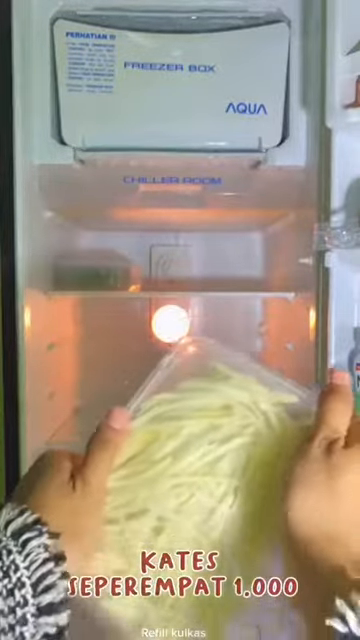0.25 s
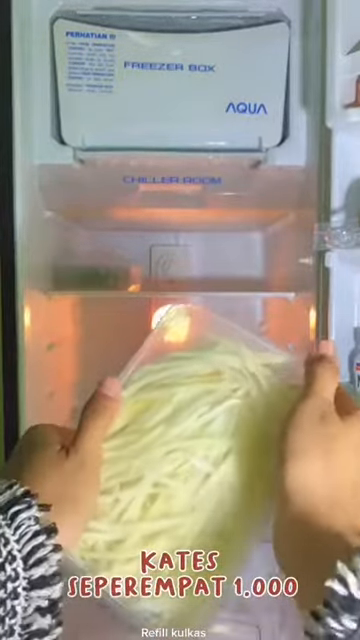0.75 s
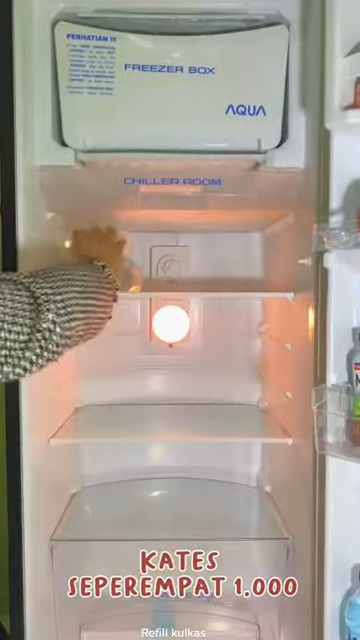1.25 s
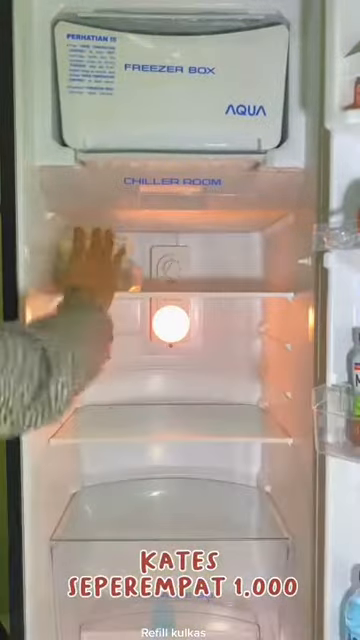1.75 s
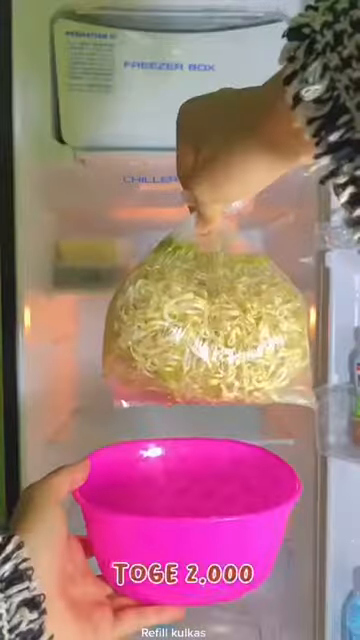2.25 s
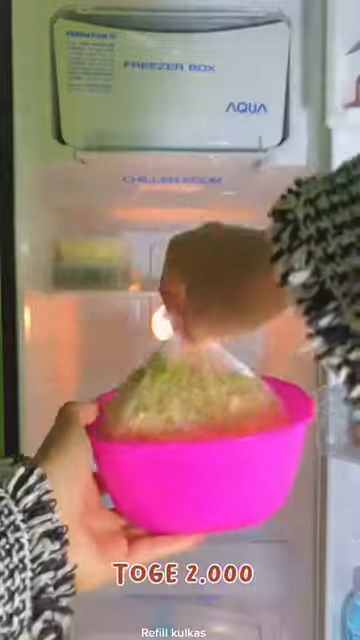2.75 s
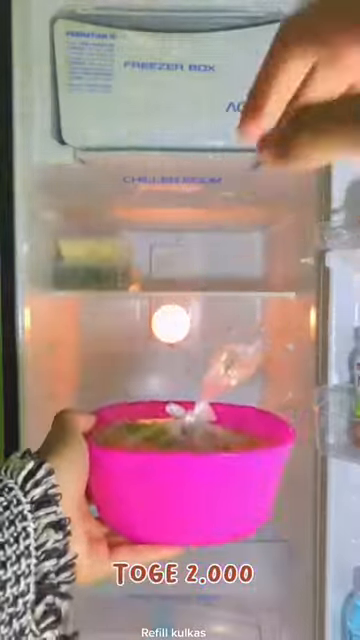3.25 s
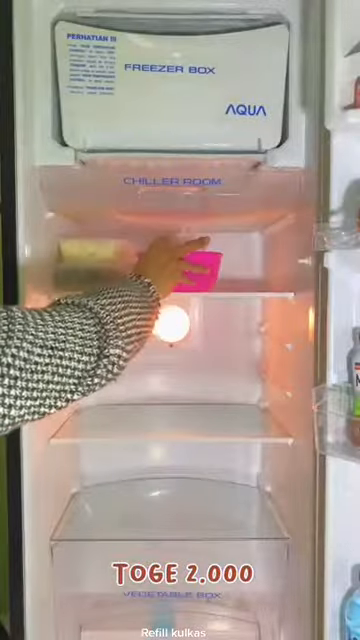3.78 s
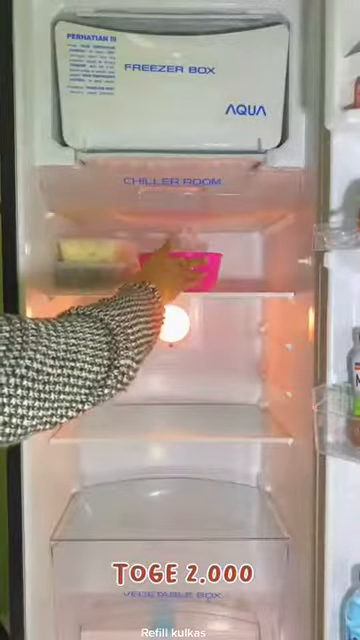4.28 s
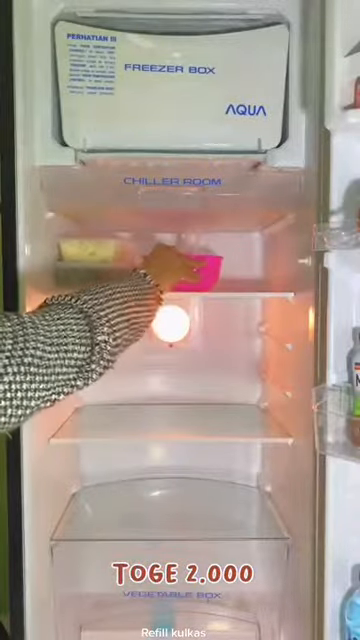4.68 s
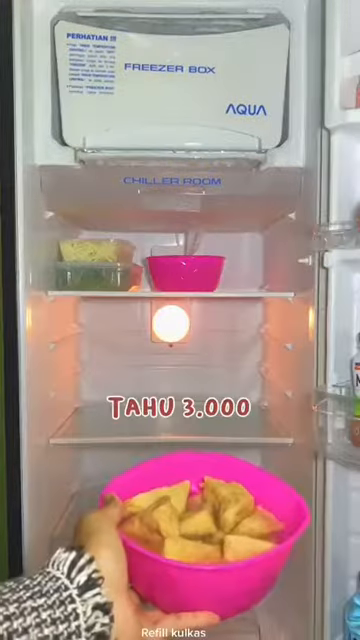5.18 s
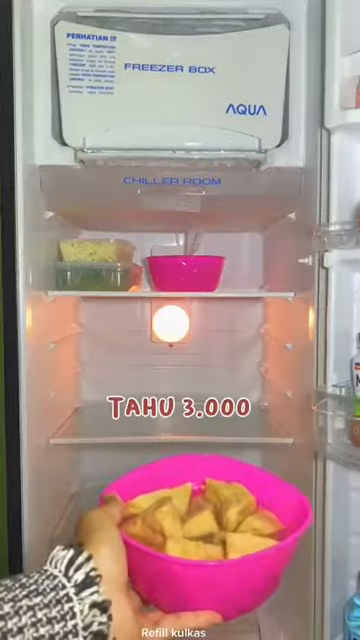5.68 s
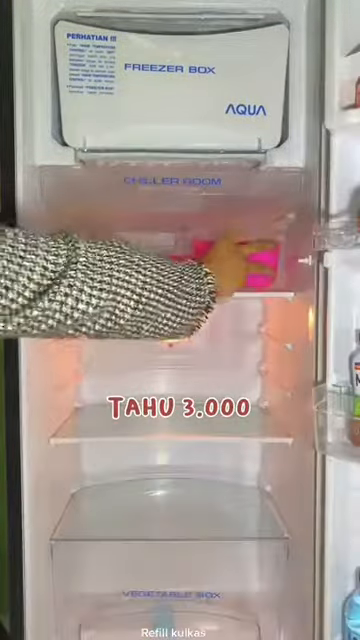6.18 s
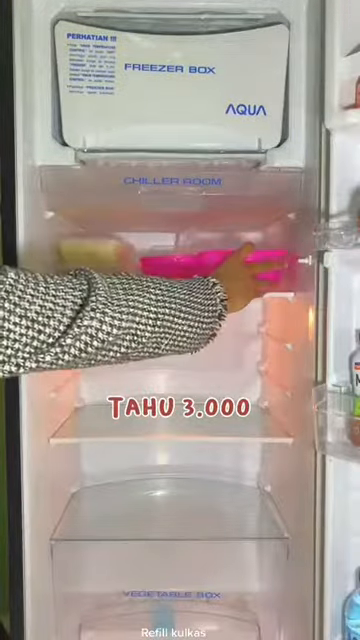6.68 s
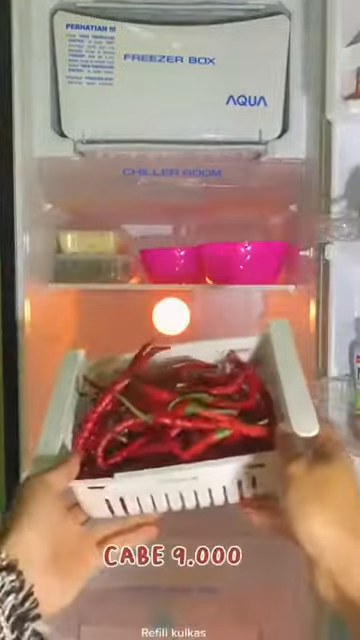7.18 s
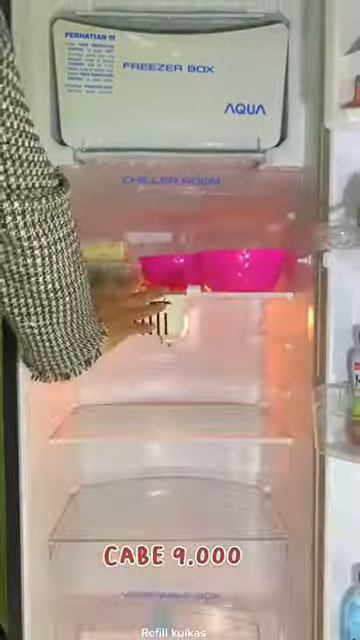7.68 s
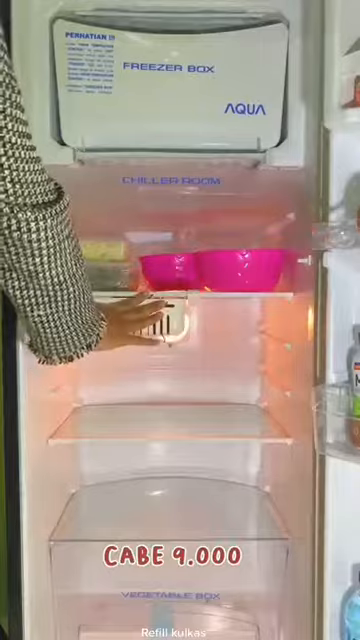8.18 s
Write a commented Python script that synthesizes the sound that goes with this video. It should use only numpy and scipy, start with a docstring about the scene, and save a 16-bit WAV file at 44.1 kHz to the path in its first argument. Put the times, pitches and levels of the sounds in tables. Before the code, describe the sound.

A low, muffled drone of traffic and engines runs throughout, heard from a hard-walled kitchen with a short echo. At first a plastic bag is patted, with quick pops and crinkles, loudest from 0.6 to 0.8 seconds. Around 1.1 seconds plastic knocks and scrapes on a glass fridge shelf, followed by a deep engine hum and a faint wavering tone. A bag crackles and pops from 2.4 to 2.8 seconds. A plastic bowl clacks down at 3.5 seconds, slides softly, and knocks again with a sharp click at 4.7. After a quieter stretch, another bowl lands at 6.1 seconds, with scrapes, rustles and lighter bumps. A plastic tray rattles sharply near 6.9 seconds, then scrapes and knocks onto the shelf from 7.6 to 7.9. Everything is close to the phone microphone, and each brief moment stops abruptly before the next.

```python
"""Pops, crinkles, knocks and scrapes sound over a low drone of traffic and engines beyond the walls.
Bags and plastic bowls are patted, slid and set down on the glass shelves of an open fridge in a
hard-walled kitchen. Air trapped in the bags pops, their creases snap, and the bowls ring and shake the
shelves. Eight moments follow one another; each stops short and the next fades in.
A phone close to the door hears it all and clips the hardest knocks."""
import sys
import numpy as np
from scipy import signal
from scipy.fft import rfft, irfft
from scipy.io import wavfile
from scipy.ndimage import uniform_filter1d, map_coordinates

SR = 44100
rng = np.random.default_rng(int(sys.argv[2]) if len(sys.argv) > 2 else 0)


def int16_out(signal):
    """Quantize to a 16-bit WAV file."""
    q = np.round(np.clip(np.atleast_2d(signal).T, -1, 1) * 32767)
    wavfile.write(sys.argv[1], SR, q.astype(np.int16))


N = 372204

# where one moment stops and the next begins (time [s])
CUTS = [0.953, 1.984, 3.204, 4.779, 5.641, 6.837, 7.585]
# each moment's background (boom centre [Hz], boom half width [Hz], murmur [dB], cloth and film hiss [dB])
BACKGROUNDS = [(58.7, 14.7, -36, -57), (61.5, 12, -35.5, -53), (65, 17, -41.5, -58), (69.8, 18, -37, -49.5),
               (54, 13.3, -40, -59), (52.4, 9, -39.5, -48), (61, 16.4, -41, -57.5),
               (60.5, 14.4, -42, -60.5)]
# the notes, or modes, at which each thing rings (pitch [Hz], level [dB], time to fade by 60 dB [s])
CABINET_MODES = [(117.6, -9, 0.75), (145, -4, 0.16), (166.6, -10, 0.031)]
SHELF_MODES = [(234, -3, 0.17), (281, -6.5, 0.13), (300, -1, 0.13), (337.2, -6.5, 0.19), (378, -2.5, 0.18),
               (400, -5, 0.14), (440, -4.5, 0.1), (479.4, -3, 0.078), (571.4, -8.5, 0.3), (676, -20, 0.079),
               (784, -8, 0.031), (838, -10, 0.16)]
BOWL_MODES = [(867, 9, .03), (980, 8.5, 0.027), (1235, 12.5, .02), (1450, 7, 0.016), (1567, 8.5, 0.029),
              (1840, 7, .016), (2080, 7.5, .02), (2553, 3.5, .018), (3000, 0, .014), (3696, 2.5, 0.017),
              (4070, 2.5, .016)]
MODE_COUNT = len(CABINET_MODES + SHELF_MODES + BOWL_MODES)


def gain(db):
    """Turns decibels into a number to multiply by."""
    return np.exp(np.asarray(db) * (np.log(10) / 20))


def unit_rms(x):
    """Scales a sound to an average strength (rms) of 1."""
    return x / np.sqrt(np.mean(x ** 2))


def unit_peak(x):
    """Scales a sound so that its biggest swing is 1."""
    return x / np.max(np.abs(x))


def band(x, low_hz, high_hz):
    """Keeps mostly what lies between two frequencies, by filtering twice."""
    high_hz = min(high_hz, .45 * SR)
    centre_hz = np.sqrt(low_hz * high_hz)
    b, a = signal.iirpeak(centre_hz, centre_hz / (high_hz - low_hz), SR)
    return signal.lfilter(b, a, signal.lfilter(b, a, x))


def wander(per_s):
    """Glides to a new random value per_s times a second; rms 1."""
    step = int(SR / per_s)
    return unit_rms(uniform_filter1d(np.repeat(rng.standard_normal(N // step + 1), step), step)[:N])


def crackle(per_s, spread_db):
    """Random clicks of very unequal size; rms 1."""
    out, count = np.zeros(N), int(per_s * N / SR)
    sizes = rng.standard_normal(count) * gain(spread_db * rng.exponential(size=count))
    out[rng.integers(N, size=count)] = sizes
    return unit_rms(out)


def hump(t, swell_ms):
    """Swells to 1, then dies away."""
    age = t * 1000 / max(swell_ms, .3)
    return age * np.exp(1 - age)


def moment_index():
    """Tells which moment is playing at each sample."""
    return np.searchsorted(CUTS, np.arange(N) / SR)


def add(out, start_s, x):
    """Mixes x into out, stopping where its moment ends."""
    first = int(start_s * SR)
    end = min([int(cut * SR) for cut in CUTS if cut > start_s] + [N, first + len(x)])
    out[first:end] += x[:end - first]


def gesture(start_s, rise_s, hold_s, fall_db_per_s):
    """The loudness of one movement: it swells to 1, holds, then fades."""
    out, t = np.zeros(N), np.arange(SR) / SR
    swell = np.minimum(t / rise_s, 1) ** 0.88
    add(out, start_s, swell * gain(-fall_db_per_s * np.maximum(t - rise_s - hold_s, 0)))
    return out


def tone(times, hz, db, harmonics=((1, 0),), waver=0):
    """A note that follows pitch and level curves; waver makes both unsteady."""
    out, t = np.zeros(N), np.arange(times[0], times[-1], 1 / SR)
    bend, flutter = (waver * wander(per_s=14.4)[:len(t)] for _ in range(2))
    phase = 2 * np.pi * np.cumsum(np.interp(t, times, hz) * (1 + 0.0061 * bend)) / SR
    wave = sum(gain(harmonic_db) * np.sin(k * phase + k * k) for k, harmonic_db in harmonics)
    fade = np.minimum(np.minimum(t - times[0], times[-1] - t) / 0.02, 1)
    add(out, times[0], np.sqrt(2) * wave * gain(np.interp(t, times, db) + 4.5 * flutter) * fade)
    return out


def ring(modes, blow, chance, spread_db):
    """A blow sets the modes ringing; chance nudges the level and pitch of each. Peak 1."""
    out = 0
    for (hz, db, fade_s), (louder, sharper) in zip(modes, chance):
        decay = np.exp(-np.log(1000) / (fade_s * SR))
        angle = 2 * np.pi * hz * (1 + 0.0274 * sharper) / SR
        note = np.sin(angle) * signal.lfilter([1], [1, -2 * decay * np.cos(angle), decay ** 2], blow)
        out = out + gain(db + spread_db * louder) * note
    return unit_peak(out)


def favour(modes, best_hz, db_per_octave):
    """Where a thing is struck decides its loudest modes: those far from best_hz are turned down."""
    return [(hz, db - db_per_octave * abs(np.log2(hz / best_hz)), fade_s) for hz, db, fade_s in modes]


def traffic():
    """Traffic through the walls: a deep boom, pitched anew each moment, over a murmur and faint hiss."""
    # loudness of the boom (time [s], level [dB])
    boom_levels = [(0, -35.5), (.14, -23), (.32, -33), (.47, -19.5), (.7, -33.5), (.94, -25), (1.0, -26),
                   (1.96, -29.5), (2.05, -29), (2.6, -33.5), (2.9, -28.5), (3.2, -31.5), (4.75, -27.5),
                   (4.85, -25.5), (5.62, -24.5), (5.7, -34), (5.9, -25), (6.6, -28), (6.72, -18.5),
                   (6.88, -31), (7.15, -39.5), (7.35, -28.5), (8.44, -27)]
    # tone colour of the murmur (frequency [Hz], relative level [dB])
    murmur_colour = [(59, -34.5), (100, -5), (266, -13), (365, -10.5), (752, -34.5), (1500, -46),
                     (4110, -56), (5300, -45), (6300, -49.5), (7600, -47), (9000, -67), (11000, -48),
                     (13000, -53.5), (16000, -59)]
    now, noise = moment_index(), rng.standard_normal(N)
    boom = sum((now == k) * unit_rms(band(noise, hz - half_hz, hz + half_hz))
               for k, (hz, half_hz, _, _) in enumerate(BACKGROUNDS))
    boom *= gain(np.interp(np.arange(N) / SR, *np.transpose(boom_levels)))
    freqs = np.maximum(np.fft.rfftfreq(N, 1 / SR), 1)
    colour_hz, colour_db = np.transpose(murmur_colour)
    colour = gain(np.interp(np.log(freqs), np.log(colour_hz), colour_db, left=-60))
    murmur = unit_rms(irfft(rfft(rng.standard_normal(N)) * colour, N))
    return boom + murmur * gain(np.array(BACKGROUNDS)[now, 2] + 0.5 * wander(4.1))


def patchy_murmur():
    """A faint murmur near 1 kHz: narrow bands of noise each swell and sink on their own."""
    # its bands (centre [Hz], half width [Hz], relative level [dB])
    bands = [(885, 52, 3.5), (1060, 68, 1.5), (1270, 80, -7), (1450, 90, -8.5)]
    # its loudness (time [s], level [dB])
    levels = [(0, -43), (2, -72.5), (4.1, -55), (4.3, -69), (4.4, -55), (4.55, -60), (4.85, -54.5),
              (4.97, -53), (5.15, -69.5), (5.301, -64), (5.45, -58), (5.62, -58), (5.7, -65), (6.1, -59),
              (8.44, -64)]
    murmur = sum(gain(db + 7 * wander(5.3))
                 * unit_rms(band(rng.standard_normal(N), hz - half_hz, hz + half_hz))
                 for hz, half_hz, db in bands)
    return unit_rms(murmur) * gain(np.interp(np.arange(N) / SR, *np.transpose(levels)))


def crinkle():
    """Crinkling film: the loudness flares at random and sinks back within milliseconds."""
    creases = np.abs(crackle(per_s=55, spread_db=2.4))
    flares = signal.fftconvolve(creases, hump(np.arange(SR // 20) / SR, swell_ms=3.4))[:N]
    return 1 + gain(-4.5) * unit_rms(flares) / 2


def bag_rustle():
    """Plastic film is squeezed and slid: tiny creases pop over a hiss, each band crinkling on its own."""
    # squeezes (start [s], rise [s], hold [s], level [dB], tilt towards treble [dB/octave], fall [dB/s])
    squeezes = [(0, 0.012, 0.048, -52.5, -13.5, 200), (0.157, 0.011, 0.019, -39, -13, 194),
                (0.292, 0.0088, 0.011, -38.5, 7, 300), (0.359, 0.018, 0.034, -43, -11, 144),
                (.5, 0.078, 0.14, -44, -9.5, 98), (0.63, 0.008, 0.02, -28.5, 3.5, 127),
                (0.697, 0.008, 0.03, -29.5, 1.5, 110), (0.785, 0.006, 0.011, -23, 1.5, 200),
                (0.817, 0.0046, 0.024, -25.5, 2.5, 98), (1.074, 0.063, 0.076, -27.5, 2, 153),
                (2.438, 0.0086, 0.012, -36, 6.5, 88), (2.527, 0.05, 0.047, -26.5, 4.5, 161),
                (2.642, 0.025, 0.065, -28, 3.5, 99), (2.715, 0.014, 0.055, -19.5, 4.5, 128),
                (3.211, 0.0092, 0.17, -39, 3.5, 192), (3.232, .005, .01, -42.5, 10, 198),
                (3.307, .02, 0.037, -47, 9, 198), (3.527, .01, .02, -40, 5, 149),
                (3.623, 0.029, 0.068, -38.5, 5.5, 250), (4.044, 0.016, 0.018, -46.5, 1, 101),
                (4.57, 0.024, 0.14, -41.5, 2, 92), (4.681, 0.006, 0.025, -30, 1, 124),
                (5.692, 0.073, 0.34, -39, 0.5, 21), (5.761, 0.0084, .03, -41, 4, 120),
                (5.936, .005, .03, -52, 10.5, 118), (6.077, 0.019, 0.18, -35.5, 2.5, 99),
                (6.224, 0.034, 0.052, -33, -4, 50), (6.46, 0.011, 0.044, -35, 0, 53),
                (6.526, 0.0035, 0.01, -42.5, 8.5, 126), (6.622, .02, .03, -39, 3.5, 100),
                (6.664, 0.0045, 0.013, -41, 2, 157), (6.91, 0.02, 0.011, -20, 3, 147),
                (7.586, 0.006, 0.16, -36.5, -3.5, 93), (7.735, 0.026, 0.05, -22.5, -2, 238),
                (8.238, 0.015, 0.015, -51, 3.5, 116)]
    # bands of the rustle (centre [octaves above middle_hz], half width [octaves], relative level [dB])
    bands = [(-1.5, 0.98, -2.5), (-0.5, 0.73, 3.5), (0.23, 0.76, 1), (0.56, .5, -2), (1.3, 0.25, -5),
             (2.2, 0.3, -7.5), (2, 0.3, -8), (2.35, 0.27, -10)]
    middle_hz, hiss_db_per_octave = 2800, 2
    power = np.array([gesture(start, rise, hold, fall) ** 2 for start, rise, hold, _, _, fall in squeezes])
    squeeze_db, tilt = np.array(squeezes)[:, 3:5].T
    hiss_db = np.array(BACKGROUNDS)[moment_index(), 3]
    film = (0.49 * crackle(1400, 2.1) + rng.standard_normal(N)) * gain(1.7 * wander(30))
    out = np.zeros(N)
    for octave, half, band_db in bands:
        squeeze_power = gain(squeeze_db + octave * tilt) ** 2 @ power  # adds up all the squeezes
        hiss_power = gain(hiss_db + octave * hiss_db_per_octave) ** 2
        level = np.sqrt(squeeze_power + hiss_power) * gain(band_db + 1.2 * wander(35))
        part = band(film, middle_hz * 2. ** (octave - half), middle_hz * 2. ** (octave + half))
        out += level * unit_rms(crinkle() * part)
    return out / np.sqrt(len(bands))


def bag_pats():
    """Trapped air pops, its pitch dropping as the bag flattens; the film snaps and the contents thud."""
    # pats on the bags (time [s], pop [dB], pitch at the peak [Hz], snap [dB], thud [dB], swell [ms],
    # pitch lost [share per ms])
    pats = [(0.051, -23.5, 890, -53, -27, 3.7, .045), (0.143, -18, 920, -45, -27, 3.6, 0.062),
            (0.169, -17.5, 1080, -27, -25.5, 5.4, 0.03), (0.193, -21, 930, -42, -22, 4.1, 0.042),
            (0.214, -21.5, 960, -43, -42, 3.8, 0.049), (0.297, -18.5, 1110, -48, -33, 6, 0.024),
            (0.314, -12.5, 1157, -47, -40, 4.5, 0.024), (0.362, -4.5, 940, -24.5, -18, 3.5, 0.044),
            (0.42, -24, 880, -35.5, -46, 4.8, 0.068), (0.575, -14, 807, -45, -11.5, 4.1, 0.08),
            (0.636, -0.5, 990, -9.5, -0.5, 3.2, 0.1), (0.695, -3.5, 997, -7.5, -12.5, 3.84, 0.017),
            (0.778, -17, 1110, -41, -42, 2.8, .03), (0.792, -9.5, 1164, -10.5, -15.5, 3.66, 0.12),
            (0.824, -2, 980, -8, -35, 3.3, 0.03), (1.498, -22, 940, -69, -49, 4.3, 0.041),
            (1.52, -23.5, 930, -68.5, -42, 3.5, 0.035), (2.622, -4, 1270, -13, -20, 2.63, 0.091),
            (5.882, -24, 1285, -55, -56, 4.4, .045)]
    thud_hz, thud_lag_s = 308, .00538  # the contents take the blow just after the pop
    out, t = np.zeros(N), np.arange(int(.08 * SR)) / SR
    thud_t = np.maximum(t - thud_lag_s, 0)
    thud = unit_peak(np.sin(2 * np.pi * thud_hz * thud_t) * hump(thud_t, swell_ms=1.5) ** 2)
    for start, pop_db, hz, snap_db, thud_db, swell_ms, drop in pats:
        air_noise, film_noise = rng.standard_normal((2, len(t)))
        pitch = np.maximum(hz * (1 - drop) ** (t * 1000 - swell_ms), 280)
        puff = .5 * unit_rms(band(air_noise, hz * .25, hz * 1.8))
        pop = unit_peak((np.sin(2 * np.pi * np.cumsum(pitch) / SR) + puff) * hump(t, swell_ms) ** 2)
        snap = 1.13 * band(film_noise, 1400, 10500) * hump(t, 0.5 * swell_ms)
        add(out, start - .001, gain(pop_db) * pop + gain(snap_db) * snap + gain(thud_db) * thud)
    return out


def plastic_ticks():
    """Creases snap and plastic edges rattle, each a very short burst of noise."""
    # single ticks (time [s], level [dB], rough pitch [Hz], swell [ms])
    ticks = [(0.517, -24, 1480, 1.8), (0.664, -29, 1100, 2.6), (0.728, -17, 1100, 1.3),
             (0.811, -16, 1100, 4.2), (1.065, -19, 2930, 4.7), (2.169, -26, 4360, 1.7),
             (2.2423, -34.5, 8000, 4.2), (2.3037, -36.5, 6160, 1.7), (2.346, -39, 8450, 2.7),
             (2.4587, -30, 6000, 2.1), (2.5656, -30, 2000, 1.8), (2.5768, -18.5, 1700, 0.46),
             (2.589, -7.5, 3500, 0.46), (2.596, -20, 1510, 5), (2.615, -10, 1500, 8.2),
             (2.636, -17.5, 2500, 3.3), (2.7248, -19, 4000, 1.9), (2.738, -25, 1600, 1),
             (2.796, -15.5, 2820, 4.1), (2.6724, -18.5, 1430, 3.8), (2.775, -12.5, 1640, 1.6),
             (3.026, -28.5, 4080, 1.2), (3.1622, -40, 3200, 3.2), (3.225, -28, 3000, 4.5),
             (3.398, -24.5, 6750, 5.1), (4.0745, -33, 3550, 2.3), (4.558, -32, 6700, 6.9),
             (4.641, -30, 1530, 2.7), (4.6789, -18, 3000, 1.9), (4.6976, -5.5, 4530, 2.7),
             (4.9426, -46, 1100, 2.2), (5.449, -46, 1450, 4.2), (5.95, -44, 2060, 3.3),
             (6.2742, -23, 3300, 9), (6.53, -24, 4130, 6.4), (6.906, -23, 4970, 2.1), (6.921, -31, 3000, 2),
             (6.931, -18, 2500, 1.2), (6.9333, -13, 2500, 0.94), (6.936, -11, 2500, 11),
             (6.95, -9, 1200, 6.9), (6.946, -13.5, 1430, 1.4), (6.949, -11, 2180, 1.2),
             (6.9545, -15, 2500, 0.36), (6.9586, 1, 3960, 1.5), (6.968, -19, 1980, 1.3),
             (6.9695, -6, 3430, 0.77), (7.579, -24.5, 1540, 2.3), (8.261, -37, 5090, 2.2)]
    out, t = np.zeros(N), np.arange(int(.08 * SR)) / SR
    for start, db, hz, swell_ms in ticks:
        click = band(rng.standard_normal(len(t)), hz * 0.35, hz * 1.84) * hump(t, swell_ms)
        add(out, start - .001, gain(db) * unit_peak(click))
    return out


def exhaust():
    """A nearby engine's exhaust hums one deep note; its level rises and dips."""
    # the path of the note (time [s], pitch [Hz], level [dB])
    note = [(0.958, 63, -6), (.988, 62.4, -14.5), (1.085, 63.7, -11.5), (1.13, 60.7, -14),
            (1.22, 61.5, -22), (1.342, 62.4, -21), (1.386, 61, -32), (1.42, 60.6, -35), (1.47, 61, -20),
            (1.621, 61.5, -16.5), (1.75, 63.4, -18), (1.818, 61, -28.5), (1.89, 61, -19.5),
            (1.92, 60.8, -34), (1.96, 60.4, -15), (1.989, 57.7, -30)]
    return tone(*np.transpose(note))


def bowl_knocks():
    """A bowl settles in a burst of tiny contacts that shake shelf and cabinet; its plastic clacks."""
    # bowls and trays set down (time [s], clack [dB], shelf [dB], cabinet [dB], settling [ms],
    # favoured shelf pitch [Hz], favoured bowl pitch [Hz], rough clack length [ms],
    # favoured cabinet pitch [Hz])
    knocks = [(1.106, 0.5, -2, -18, 8.1, 450, 2080, 3.14, 116),
              (1.175, -2, -12.5, -10.5, 14, 430, 1700, 4, 129),
              (1.213, -36, -16.5, -30, 6, 242, 1500, 3, 120), (3.52, 1, 0, -8.5, 8.3, 317, 1860, 2.9, 146),
              (4.678, -20, -10.5, -12, 25, 397, 1200, 4.6, 150),
              (4.696, -11.5, -3, -14, 6.1, 458, 2620, 2.7, 150),
              (6.104, -1, -3.5, -8, 28, 368, 940, 3.4, 139),
              (6.188, -28, -14.5, -11.5, 17, 353, 1400, 3.9, 148),
              (6.327, -23, -22, -15.5, 7.7, 330, 1500, 5, 146),
              (6.465, -12.5, -15.5, -13.5, 5.5, 330, 1965, 1.44, 149),
              (6.798, -16, -23, -28, 100, 494, 1500, 4.8, 147),
              (7.676, -39, -14.5, -16, 4.4, 290, 1400, 3, 126), (7.72, -30, -31, -27, 5, 310, 1300, 3, 130),
              (7.752, 1.5, -8, -7.5, 11, 300, 1270, 2.2, 147),
              (7.811, -23.5, -22, -38, 7.1, 390, 1700, 5.1, 147),
              (7.84, -0.5, -0.5, -17.5, 6.3, 356, 1620, 2.46, 127),
              (7.874, -35, -6.5, -36, 7.2, 395, 1500, 3, 147),
              (7.896, -38.5, -12, -39, 4.9, 360, 1500, 3, 147)]
    boom_lag_s, boom_boost_db = .007, 8  # the shelf answers after the rim has touched
    out, t = np.zeros(N), np.arange(int(.4 * SR)) / SR
    short = t[:len(t) // 4]
    fade = np.cos(np.pi / 2 * t / t[-1])
    for start, clack_db, shelf_db, cabinet_db, settle_ms, shelf_hz, bowl_hz, clack_ms, cabinet_hz in knocks:
        chance = rng.standard_normal((MODE_COUNT, 2))
        base_noise, rim_noise = rng.standard_normal((2, len(t)))
        push = base_noise * hump(t, swell_ms=12.6)  # the cabinet takes up the blow slowly
        cabinet = ring(favour(CABINET_MODES, cabinet_hz, 28), push, chance, 0.73)
        settle = base_noise * (np.exp(-t * 1000 / settle_ms) + 1e-9) + 0.82 * hump(t, 0.3)
        shelf = ring(favour(SHELF_MODES, shelf_hz, 16.5), settle, chance[len(CABINET_MODES):], 2.4)
        boom = band(gain(cabinet_db) * cabinet + gain(shelf_db) * shelf, 110, 5000)
        add(out, start + boom_lag_s, gain(boom_boost_db) * boom * fade)
        tap = rim_noise[:len(short)] * hump(short, 0.78 * clack_ms)
        clack = ring(favour(BOWL_MODES, bowl_hz, 8.6), tap, chance[-len(BOWL_MODES):], 2.5)
        rattle = band(rim_noise[-len(short):], 800, 4600) * hump(short, 1.49 * clack_ms)
        bright_edge = band(base_noise[-len(short):], 5600, 23000) * hump(short, swell_ms=1)
        add(out, start, gain(clack_db) * (0.83 * clack + 0.67 * rattle + gain(-18.5) * bright_edge))
    return out


def bowl_drags():
    """A bowl sticks and slips along the glass; the tiny clicks ring both shelf and bowl."""
    # drags (start [s], rise [s], hold [s], shelf [dB], bowl [dB], fall [dB/s], scrape centre [Hz],
    # scrape half width [octaves])
    drags = [(1.127, 0.016, 0.03, -39, -22.5, 77, 710, 0.23),
             (1.154, 0.014, 0.01, -19, -23.5, 69, 1660, 0.63),
             (3.546, 0.015, 0.038, -17, -34, 69, 1620, 0.2),
             (3.7, 0.078, 0.015, -35, -59.5, 152.5, 1520, .44),
             (4.04, 0.027, 0.39, -44, -61, 43.5, 1290, 0.21),
             (6.146, 0.013, 0.016, -13, -29, 71, 1450, 0.28),
             (6.265, 0.0086, 0.0062, -27, -22, 248, 3270, 0.5),
             (6.413, 0.016, 0.016, -29.5, -52, 81, 1580, 0.54),
             (7.594, 0.021, 0.041, -29, -30, 203, 1410, 0.16),
             (7.599, 0.0095, 0.02, -46, -31, 115, 4000, 0.47),
             (7.712, 0.01, 0.043, -44, -31.5, 296, 1360, 0.051),
             (7.773, 0.0072, 0.031, -17, -46, 54.5, 1500, 0.54)]
    chance = rng.standard_normal((MODE_COUNT, 2))
    shelf = unit_rms(ring(CABINET_MODES + SHELF_MODES, crackle(1200, 1.5), chance, 1.5))
    rasp = crackle(per_s=4000, spread_db=1.2)
    bowl = unit_rms(ring(BOWL_MODES, rasp, chance[-len(BOWL_MODES):], 2.2)) + gain(-6.5) * rasp
    out = np.zeros(N)
    for start, rise, hold, shelf_db, bowl_db, fall, hz, half in drags:
        scrape = unit_rms(band(bowl, hz / 2 ** half, hz * 2 ** half))
        out += gesture(start, rise, hold, fall) * (gain(shelf_db) * shelf + gain(bowl_db) * scrape)
    return out


def whine():
    """A wavering tone comes and goes."""
    # its notes (start [s], end [s], first pitch [Hz], last pitch [Hz], level [dB])
    notes = [(1.503, 1.652, 230.5, 239.5, -32), (1.682, 1.835, 249, 249, -34.5),
             (1.842, 1.981, 243.6, 260, -35), (4.286, 4.405, 316, 330, -37.5),
             (4.46, 4.514, 320, 320, -29.5), (4.543, 4.605, 341, 332, -36.5),
             (5.794, 6.12, 260.6, 282, -40.5)]
    return sum(tone((start, end), (first_hz, last_hz), (db, db), waver=0.55)
               for start, end, first_hz, last_hz, db in notes)


def idling_engine():
    """An engine idles through the fifth moment, humming at multiples of its slowing firing rate."""
    # parts of the hum (multiple of the firing rate, relative level [dB])
    harmonics = [(2, 13.5), (4, 0), (6, 4.5), (7, 0.5), (8, -9), (9, -1.5), (10, -4.5), (11, -4),
                 (13, -11.5), (14, -10)]
    return tone(CUTS[3:5], hz=(39.8, 37.4), db=(-45, -45), harmonics=harmonics, waver=0.6)


def kitchen_echo():
    """The hard walls answer a click with a tail of noise that dies away band by band."""
    # the echo (frequency [Hz], time to fade by 60 dB [s], relative level [dB])
    bands = [(100, 0.71, -2.5), (260, 0.7, 5.5), (704, 0.54, 1.5), (1840, 0.89, 0), (4850, 0.71, 3),
             (12800, 0.089, 3.5)]
    band_hz, band_fade_s, band_db = np.transpose(bands)
    echo_db, onset_s, late_fade_s = -9.5, 0.00098, 0.66
    tail, t = np.zeros(SR), np.arange(SR) / SR
    for hz in 90 * 2. ** np.arange(8):
        fade_s = np.interp(np.log(hz), np.log(band_hz), band_fade_s)
        db = np.interp(np.log(hz), np.log(band_hz), band_db)
        noise = band(rng.standard_normal(SR), hz / np.sqrt(2), hz * np.sqrt(2))
        tail += noise * gain(db - 60 * t / fade_s)
    tail *= np.minimum(t / onset_s, 1) * np.exp(-(t / late_fade_s) ** 3)  # late echoes die faster still
    return gain(echo_db) * tail / np.sqrt(np.sum(tail ** 2))


def scene():
    """Mixes the sounds; each moment carries only its own echoes, heard from a slightly new place."""
    drift_s, fade_in_s = .00025, 0.017
    pats, ticks, knocks = bag_pats(), plastic_ticks(), bowl_knocks()
    direct = pats + ticks + knocks + bag_rustle() + bowl_drags()
    direct += traffic() + idling_engine() + exhaust() + whine() + patchy_murmur()
    # soft bags and things close to the phone stir the kitchen less
    to_walls = gain(-3.5) * pats + gain(-1) * ticks + knocks
    # arm and door move, so the echo paths keep changing length
    drift = uniform_filter1d(wander(per_s=30), SR // 100) * drift_s * SR
    out, edges = np.zeros(N), [0] + [int(cut * SR) for cut in CUTS] + [N]
    for first, end in zip(edges, edges[1:]):
        samples = np.arange(end - first)
        echo = signal.fftconvolve(to_walls[first:end], kitchen_echo())[:end - first]
        echo = map_coordinates(echo, [samples + drift[first:end]], mode="nearest")
        fade_in = np.minimum(samples / SR / fade_in_s, 1) ** 0.62 if first else 1
        out[first:end] = (direct[first:end] + echo) * fade_in
    return out[None]


def record(dry):
    """The sound is slightly hollow near 5 kHz and lacks the deepest bass and top treble; peaks clip."""
    dip_hz, bottom_hz, top_hz = 4700, 38, 16000
    dip = signal.iirnotch(dip_hz, 8, SR)
    x = signal.lfilter(*dip, signal.lfilter(*dip, dry))
    x = signal.sosfilt(signal.butter(3, bottom_hz, "high", fs=SR, output="sos"), x)
    return signal.sosfilt(signal.ellip(10, .2, 70, top_hz, fs=SR, output="sos"), np.clip(x, -.97, .97))


dry = scene()
out = record(dry)
int16_out(out)
```